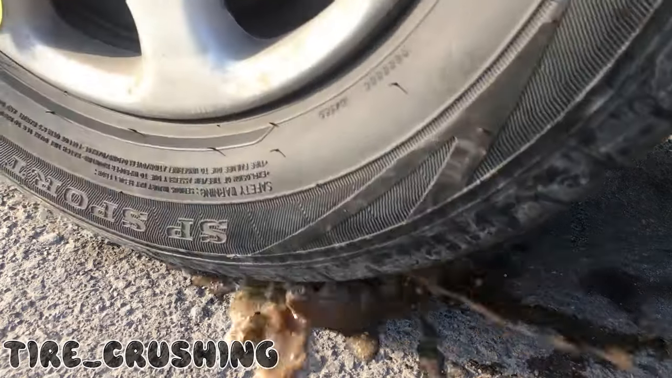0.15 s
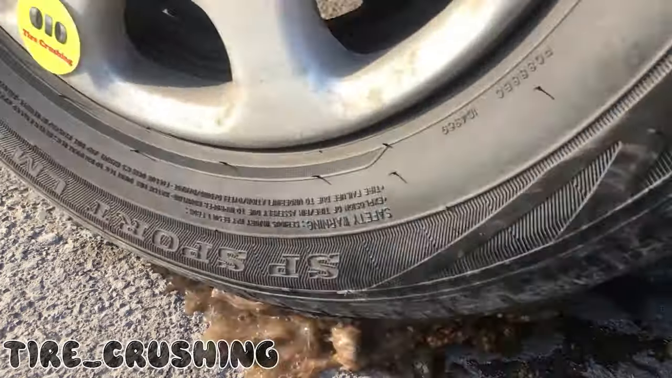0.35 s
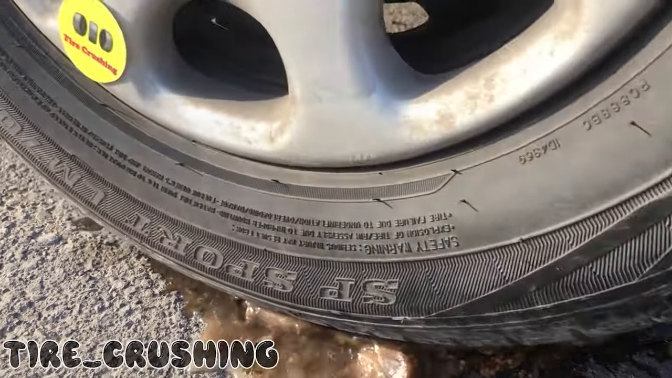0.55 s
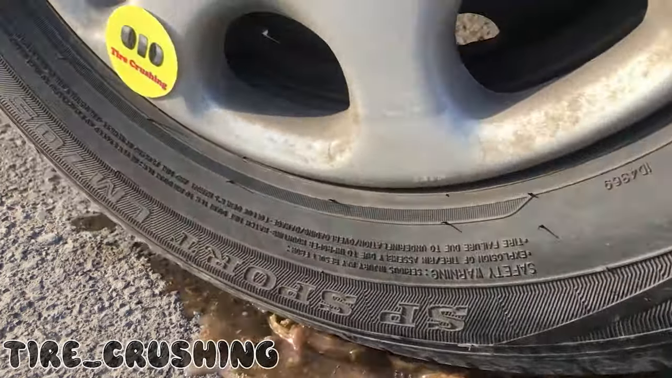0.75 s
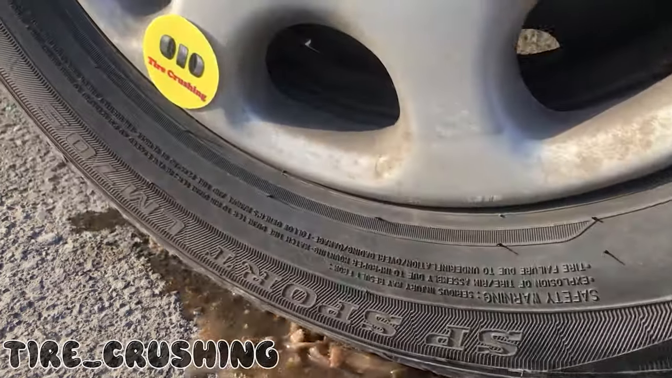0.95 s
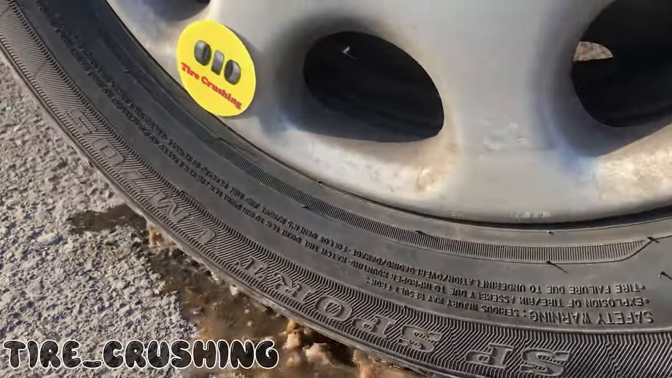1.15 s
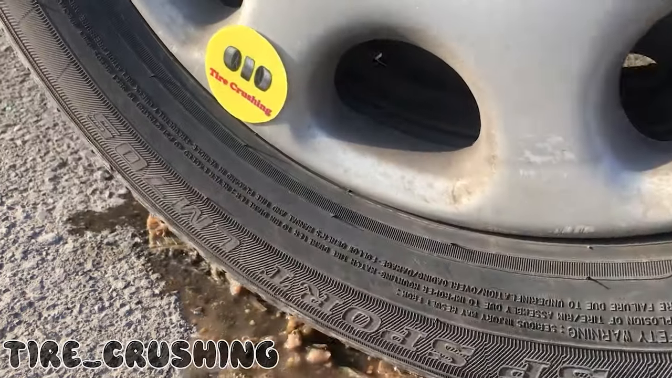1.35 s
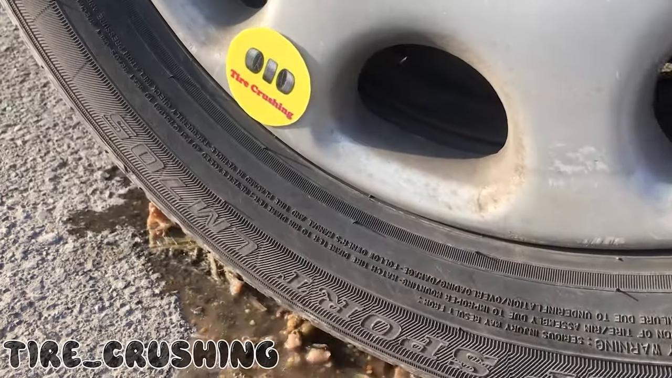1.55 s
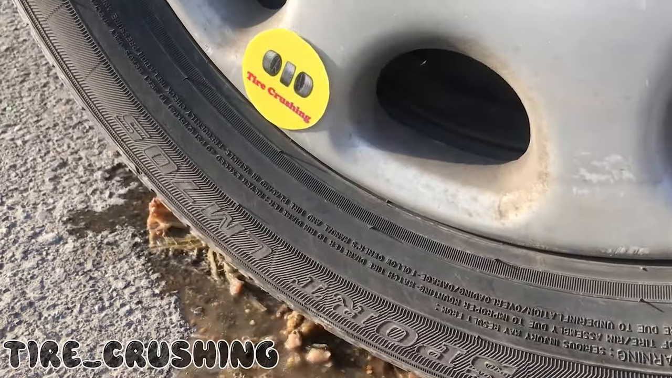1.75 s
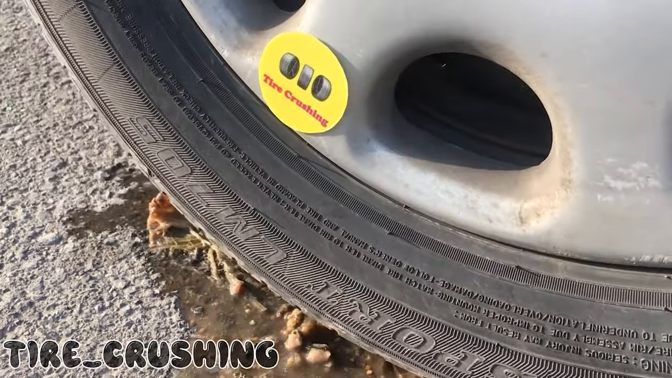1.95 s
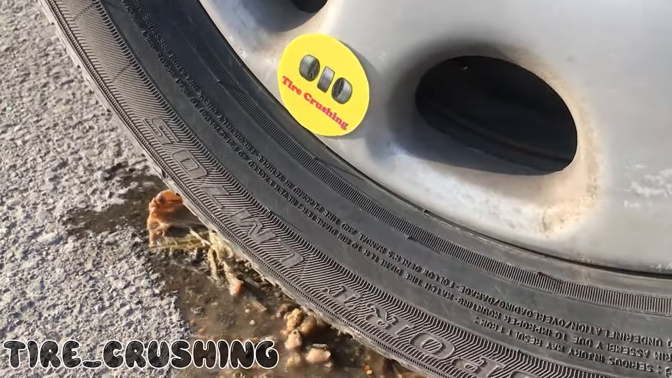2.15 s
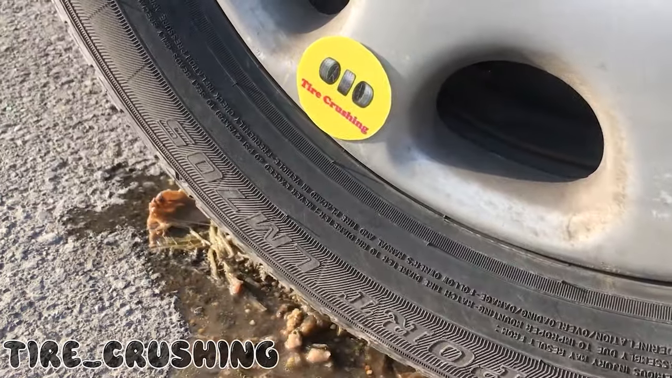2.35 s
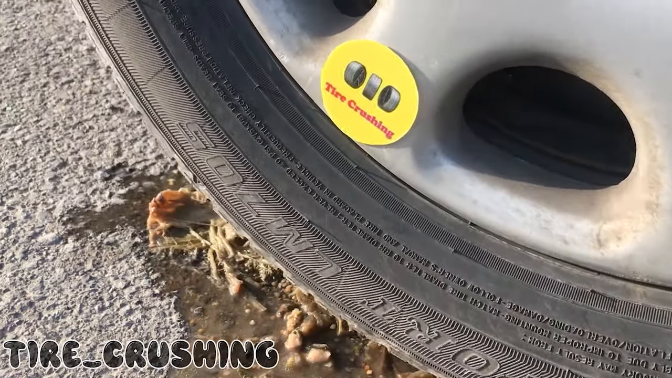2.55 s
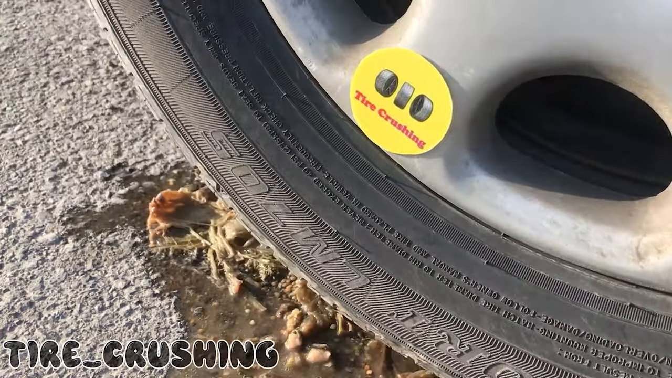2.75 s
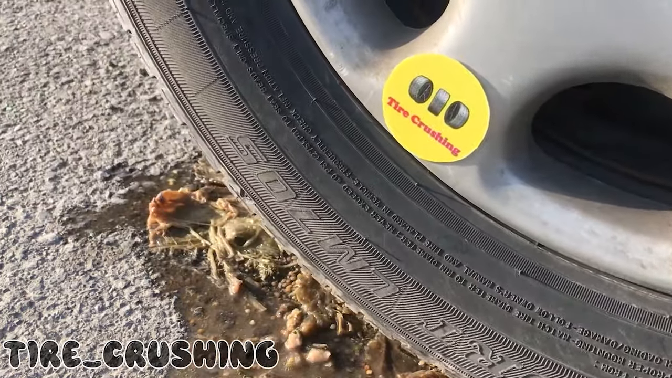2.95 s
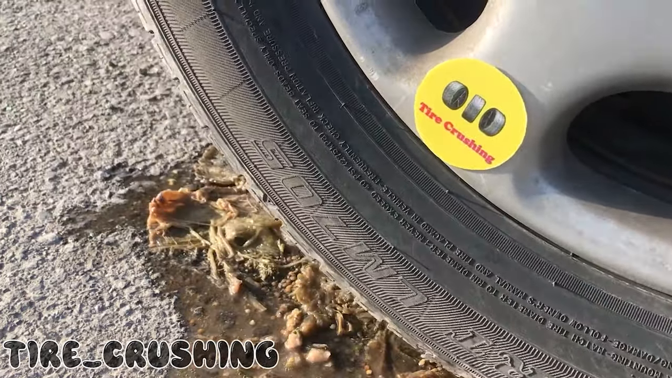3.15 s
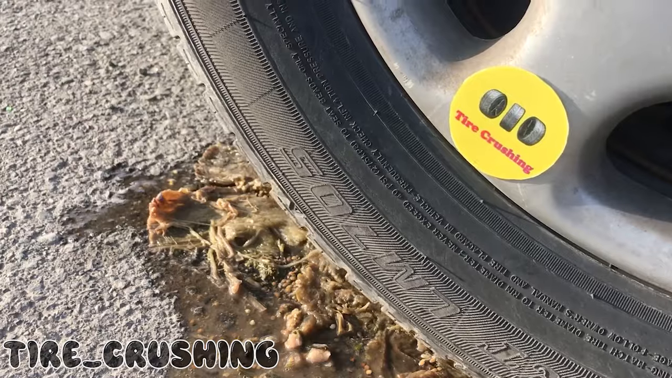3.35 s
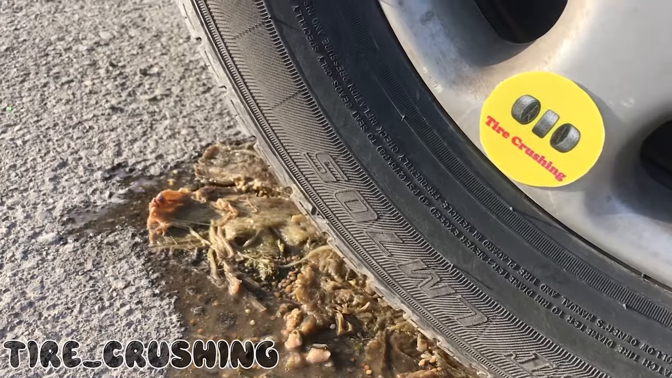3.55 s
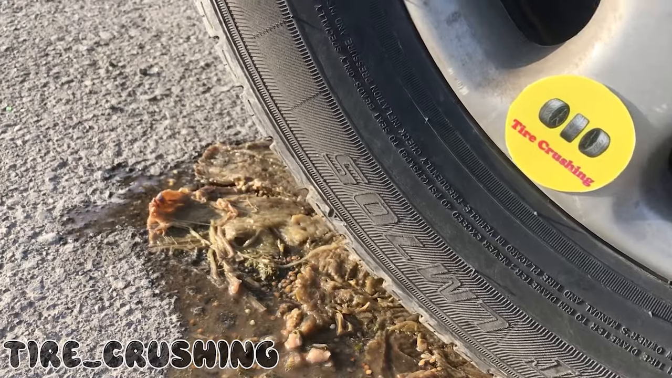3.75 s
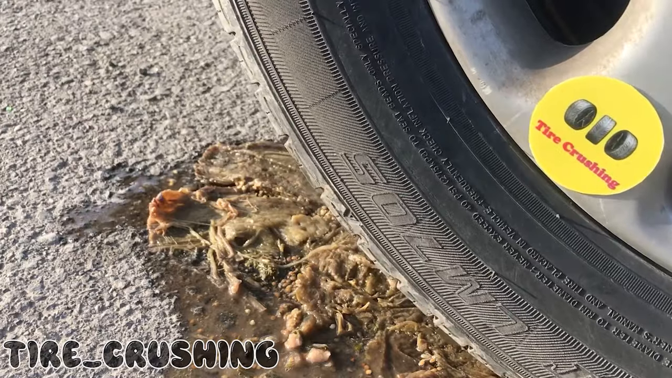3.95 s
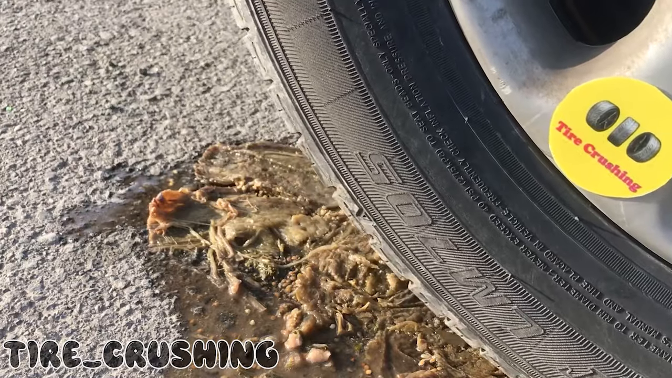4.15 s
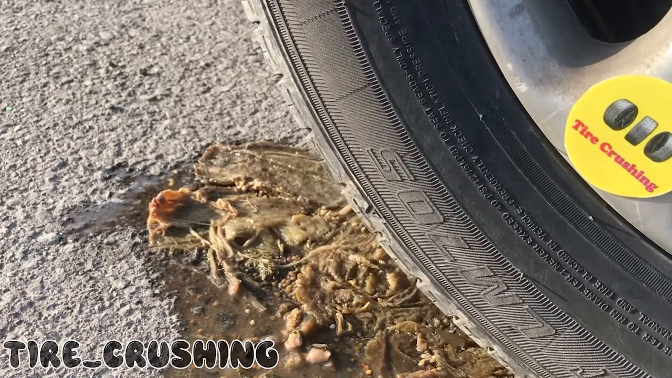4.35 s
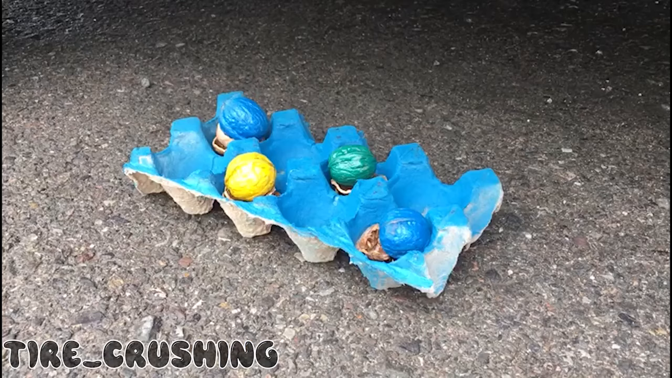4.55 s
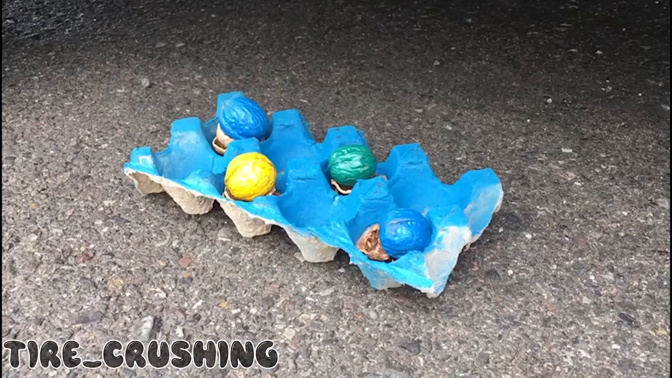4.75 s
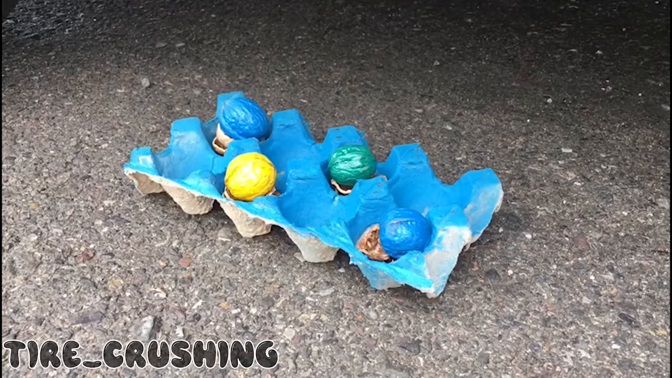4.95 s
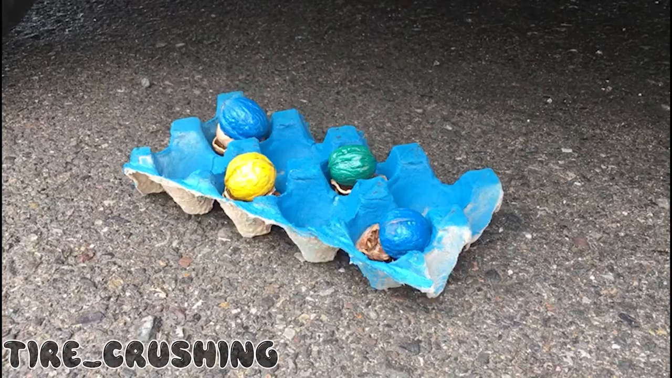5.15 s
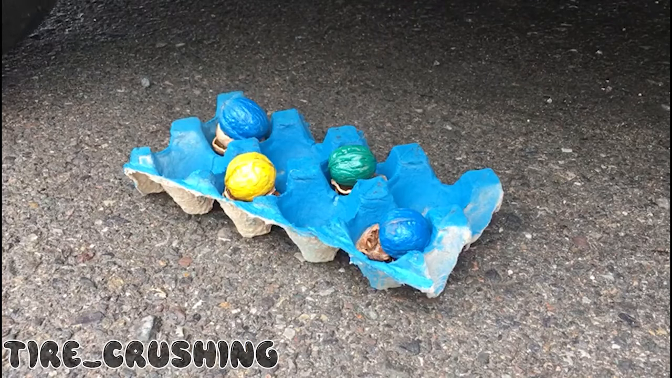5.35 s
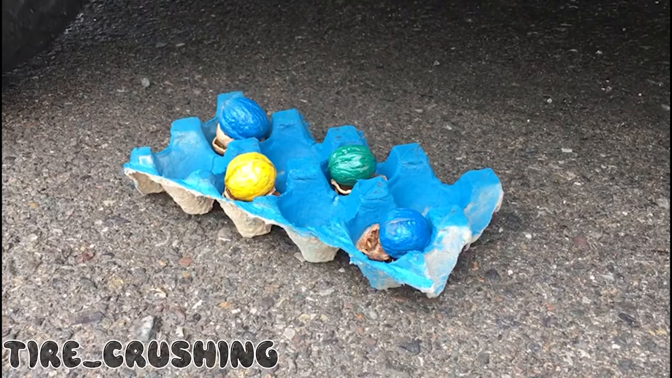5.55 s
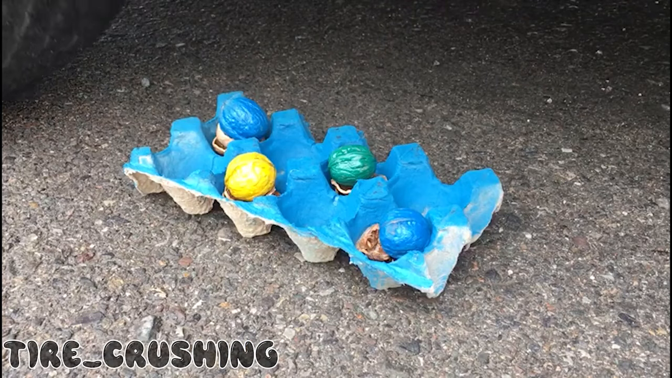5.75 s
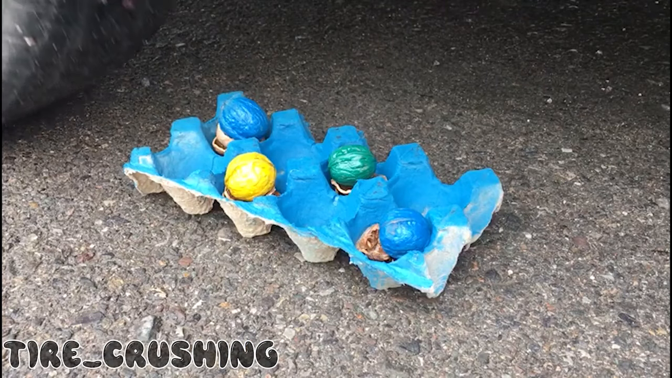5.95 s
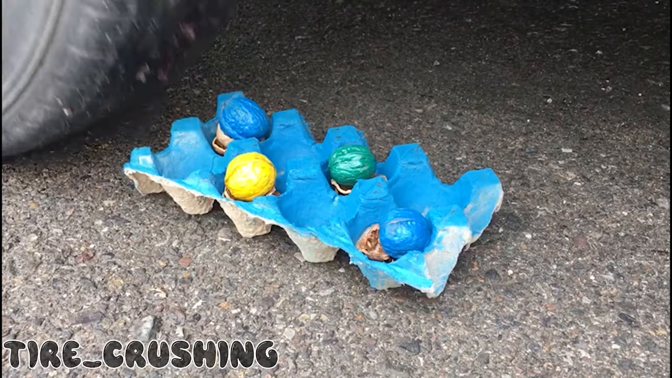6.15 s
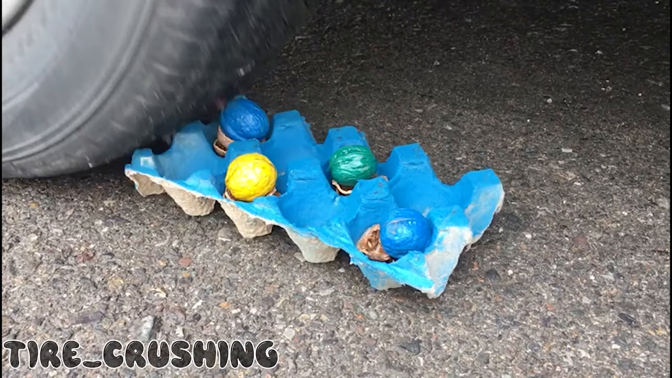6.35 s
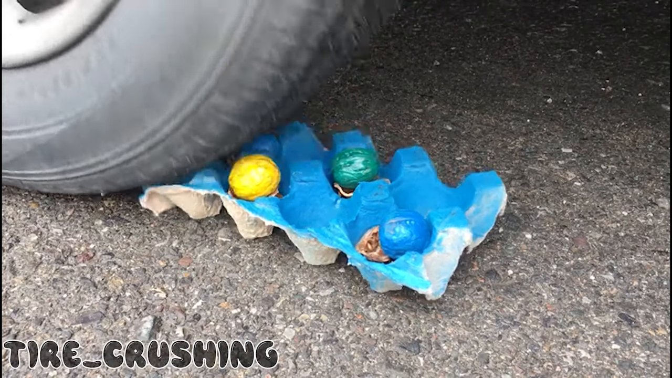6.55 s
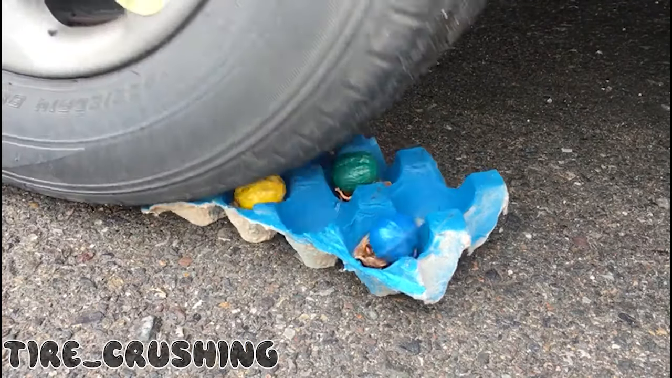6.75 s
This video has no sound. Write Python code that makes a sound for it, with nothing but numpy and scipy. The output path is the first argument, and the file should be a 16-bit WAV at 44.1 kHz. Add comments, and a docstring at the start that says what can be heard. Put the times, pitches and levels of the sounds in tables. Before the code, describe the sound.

A car idles and rolls slowly off wet squelching pulp with occasional knocks, then another approach over grit crushes walnuts in rapid, loud dry cracks.

```python
"""On asphalt, close to a tyre: a car with its engine idling rolls slowly off wet pulp, knocking now and then.
The scene then changes: the car creeps up over grit and crushes a cardboard tray of walnuts in quick dry cracks.
Shells are falling sine pops with filtered snaps and thuds; pulp, cardboard and grit are random ringing grains.
Knocks are filtered noise with decaying body modes; the cars are coloured noise and wavering sine lines.
Dense random echoes under the car answer the close sounds."""
import sys
import numpy as np
from scipy import signal
from scipy.fft import rfft, irfft
from scipy.io import wavfile
from scipy.ndimage import map_coordinates

SR = 44100
rng = np.random.default_rng(int(sys.argv[2]) if len(sys.argv) > 2 else 0)


def inscribe(sig):
    """Save sig as 16-bit PCM at rate SR to the path in sys.argv[1].

    A 1-D sig is mono; a 2-D sig holds one channel per row.
    Samples are clipped to [-1, 1] before scaling.
    """
    pcm = np.round(np.clip(np.atleast_2d(sig).T, -1, 1) * 32767)
    wavfile.write(sys.argv[1], SR, pcm.astype(np.int16))


N = 303849
T = np.arange(N) / SR
CUT_S = 4.573  # change from departing to approaching car

# shell fractures: (time [s], pop of the hollow shell [dB], its nominal pitch [Hz],
# snap of the splitting edge [dB], its pitch [Hz], thud of the dropping tyre [dB])
SHELL_FRACTURES = [(6.5118, -9.5, 1370, -4.5, 4340, -26), (6.5407, -19, 1620, -15, 3500, -29),
                   (6.545, -1.5, 1910, -6.5, 2690, -44), (6.5611, -12, 1620, -15, 3200, -32),
                   (6.577, -34, 1190, -19, 5500, -31), (6.586, -13.5, 1060, -15.5, 3540, -38),
                   (6.596, -8.5, 990, -8, 4550, -31), (6.6074, -12, 1310, -11, 4500, -25),
                   (6.615, -7, 1230, -7, 4100, -35), (6.624, 0, 1320, -8, 3300, -13.5),
                   (6.6351, -5, 1290, -9, 6400, -18), (6.6431, -13, 990, -22, 3000, -37),
                   (6.6524, -3.5, 1210, -10, 4000, -20), (6.658, 0, 1004, -8, 5740, -13.5),
                   (6.662, -10, 1260, -9.5, 5130, -14), (6.6697, -2.5, 1150, -11, 3030, -26),
                   (6.688, -2, 953, -11, 3180, -23), (6.717, -29, 1180, -23, 3500, -43),
                   (6.7356, -7, 1070, -15.5, 4600, -23), (6.743, -25, 1170, -18.5, 4180, -27),
                   (6.7801, -18, 1170, -22, 2500, -36), (6.785, -6.5, 920, -13, 5000, -14.5),
                   (6.7869, 1, 1014, -7.5, 3370, -2.5), (6.795, -7, 834, -21, 4000, -17),
                   (6.8027, -14, 1250, -16, 5500, -16), (6.825, -28, 2070, -11.5, 7260, -26),
                   (6.833, -17, 1400, -12.5, 8000, -26), (6.8427, -11, 1230, -8, 3080, -32),
                   (6.8439, -0.5, 910, -6, 6600, -28), (6.853, -25, 1240, -19, 4500, -39),
                   (6.8578, -20, 1360, -9, 6000, -44), (6.8615, -10, 820, -9, 7560, -13.5),
                   (6.8715, -6.5, 850, -15, 4500, -23)]


def amp(db):
    """Amplitude factor of a level in dB."""
    return 10 ** (np.asarray(db) / 20)


def evened(x):
    """Scale to unit rms."""
    return x / np.sqrt(np.mean(x ** 2) + 1e-20)


def read(points, hz):
    """Interpolate (frequency [Hz], value) over log frequency."""
    f, value = np.transpose(points)
    return np.interp(np.log(hz + 1), np.log(f + 1), value)


def level(curve):
    """Gain along (time [s], level [dB]), silent beyond 50 ms outside it."""
    s, db = np.transpose(curve)
    return amp(np.interp(T, s, db)) * (T > s[0] - .05) * (T < s[-1] + .05)


def add(mix, s, sound):
    """Add a sound to the mix in place, starting at s seconds."""
    part = mix[max(round(s * SR), 0):][:len(sound)]
    part += sound[:len(part)]


def colour(x, points, size=4096):
    """Minimum-phase filter of the given spectrum and unit energy: clicks keep their sharp front."""
    log_gain = np.log(amp(read(points, abs(np.fft.fftfreq(size, 1 / SR)))))
    spectrum = np.exp(signal.hilbert(log_gain).conj())
    taps = np.fft.ifft(spectrum).real[:size // 2]
    return signal.oaconvolve(x, taps / np.linalg.norm(taps))[:len(x)]


def drift(rate_hz):
    """Slow random curve of unit rms: noise under a Gaussian low-pass."""
    hz = np.fft.rfftfreq(N, 1 / SR)
    spectrum = rfft(rng.standard_normal(N)) * np.exp(-(hz / rate_hz) ** 2)
    return evened(irfft(spectrum, N))


def burst(s, length, rise, fall):
    """Linear attack, hold and exponential release; all in seconds."""
    attack = np.clip((T - s) / rise, 0, 1)
    return attack * np.exp(-np.maximum(T - s - length, 0) / fall)


def grains(per_s, spread_db, low_hz, high_hz, cycles, count=24):
    """Tiny clicks of uneven size, each ringing a resonator of random pitch that falls to 1/e in `cycles`."""
    size_db = spread_db * np.minimum(rng.exponential(1, N), 4)
    struck = rng.random(N) < per_s / SR
    size = amp(size_db) * rng.choice([-1, 1], N) * struck
    kind, out = rng.integers(0, count, N), np.zeros(N)
    for k, hz in enumerate(np.linspace(low_hz, high_hz, count)):
        r = np.exp(-hz / cycles / SR)
        turn = r * np.cos(2 * np.pi * hz / SR)
        clicks = size * (kind == k) + 1e-18  # offset avoids denormals
        out += signal.lfilter([1, -turn], [1, -2 * turn, r * r], clicks) * np.sqrt(1 - r)
    return evened(out)


def edge_colour(edge_hz, count=22):
    """Spectrum of one snap: the colour of shell, lifted where this edge rings, with uneven side peaks."""
    # shell colour: (frequency [Hz], level [dB])
    shell_colour = [(800, -4.5), (2000, 5), (3200, 0.5), (4200, 4), (7000, 1.5), (10000, -6),
                    (12500, -11.5)]
    lift_db, width_octaves, uneven_db = 7, 0.24, 2.5
    hz = np.geomspace(shell_colour[0][0], shell_colour[-1][0], count)
    lift = lift_db * np.exp(-(np.log2(hz / edge_hz) / width_octaves) ** 2)
    return np.c_[hz, read(shell_colour, hz) + lift + uneven_db * rng.standard_normal(count)]


def walnuts():
    """Each edge snaps, the pop falls in pitch as the shell opens, and the tyre thuds, lower for a deeper pop."""
    start, settle, glide_s = 2.28, 0.7, 0.00036  # pop pitch: nominal x (settle + start * decay)
    pop_cycles, snap_s = 2.04, 0.00087  # pop length in nominal cycles
    thud_share, thud_s = 0.23, 0.002  # thud pitch: nominal x share
    out, t = np.zeros(N), np.arange(SR // 25) / SR
    for s, pop_db, hz, snap_db, edge_hz, thud_db in SHELL_FRACTURES:
        turns = np.cumsum(hz * (settle + start * np.exp(-t / glide_s))) / SR
        pop_shape = (1 - np.exp(-t / 0.00035)) * np.exp(-(t * hz / pop_cycles) ** 2)
        pop = np.sin(2 * np.pi * turns) * pop_shape
        snap_shape = np.exp(-t / snap_s) + 0.041 * np.exp(-t / 0.0015)
        snap = colour(rng.choice([-1, 1], len(t)) * snap_shape, edge_colour(edge_hz))
        thud_shape = np.exp(-t / thud_s) * (1 - np.exp(-t / 0.00028))
        thud = np.sin(2 * np.pi * hz * thud_share * t) * thud_shape
        add(out, s, amp(pop_db) * pop + amp(snap_db) * snap + amp(thud_db) * thud)
    return out


def tray():
    """Cardboard fibres break in dense clumps as the tray folds, and shards crunch after each fracture."""
    # cardboard and shell crumbs giving way: (time [s], level [dB])
    crumple_curve = [(6.39, -62), (6.45, -48), (6.53, -40), (6.595, -29.5), (6.63, -21.5), (6.72, -47),
                     (6.775, -42), (6.795, -26.5), (6.89, -49)]
    # (frequency [Hz], level [dB])
    crumple_colour = [(150, -7.5), (400, -2.5), (700, 4.5), (1600, 0), (3200, -7.5), (6000, -11),
                      (10000, -14), (13000, -25)]
    shards_db, shards_s = -17.5, 0.0075  # level against the snap, decay
    crackle = grains(5000, 3.2, 600, 12000, 1.2) * amp(1.8 * drift(90))
    shards_power = sum(amp(snap_db + shards_db) ** 2 * burst(s, 0, 0.00086, shards_s) ** 2
                       for s, _, _, snap_db, _, _ in SHELL_FRACTURES)
    gain = np.sqrt(level(crumple_curve) ** 2 + shards_power)
    return gain * evened(colour(crackle, crumple_colour))


def squish():
    """Small bubbles burst in clumps as the pulp squirts and oozes out; larger ones gurgle lower."""
    # squirts from under the tread: (time [s], length [s], fizz [dB], gurgle [dB])
    squirts = [(0, 0.0044, -46.5, -49), (.058, 0.013, -60, -64), (0.101, 0.017, -49, -54),
               (0.222, 0.0076, -50, -61), (0.25, 0.082, -50.5, -51.5), (0.383, 0.032, -65, -60),
               (0.557, 0.063, -65.5, -56), (0.668, 0.16, -64.5, -65), (.89, .06, -77, -63),
               (3.676, 0.063, -75, -68)]
    # colours of squirt, ooze and gurgle: (frequency [Hz], level [dB])
    squirt_colour = [(200, -13), (700, 12), (2000, -0.5), (3200, 4.5), (6000, -1.5), (9500, -3),
                     (12000, -16), (16000, -17)]
    ooze_colour = [(700, -3), (2000, 5.5), (3200, 4.5), (6000, 14), (8000, -9.5), (12000, -10),
                   (16000, -22)]
    gurgle_colour = [(300, -3), (700, 4.5), (1100, 3), (1700, 7), (2400, 0.5), (5000, -33)]
    rise_s, fall_s, droplets_db = 0.0013, 0.023, -8  # droplets against the fizz
    ooze_db, ooze_gurgle_db, ooze_fade_db_per_s = -60, -76, 17.5  # levels at time 0
    fizz = grains(2400, 3.3, 1200, 15000, 3.5) * amp(2.2 * drift(70))
    droplets = grains(500, 3.6, 2200, 13000, 8, count=40)
    bubbles = grains(400, 3.6, 750, 2400, 4)
    wet = fizz + amp(droplets_db) * droplets
    ooze = amp(-ooze_fade_db_per_s * T)
    squirt, gurgle = np.zeros(N), amp(ooze_gurgle_db) * ooze
    for s, length, fizz_db, gurgle_db in squirts:
        flow = burst(s, length, rise_s, fall_s)
        squirt = np.hypot(squirt, amp(fizz_db) * flow)
        gurgle = np.hypot(gurgle, amp(gurgle_db) * flow)
    squirting = squirt * evened(colour(wet, squirt_colour))
    oozing = amp(ooze_db) * ooze * evened(colour(wet, ooze_colour))
    return squirting + oozing + gurgle * evened(colour(bubbles, gurgle_colour))


def ticks():
    """Wet pops and grit snapping under the tread: each a brief ring with a splash of hiss."""
    # (time [s], level [dB], pitch [Hz])
    tick_events = [(.006, -29.5, 1730), (0.062, -40, 2900), (.095, -29, 8800), (.122, -39, 2600),
                   (0.15, -41, 2170), (0.218, -42, 2400), (.299, -36, 5040), (.33, -39, 2600),
                   (.339, -45, 2200), (.388, -33, 1920), (.394, -42, 2200), (0.446, -40, 520),
                   (0.605, -42.5, 6700), (.663, -38.5, 1770), (.734, -40.5, 3800), (1.106, -40.5, 2060),
                   (1.475, -45, 5400), (1.66, -45, 4300), (2.163, -51, 3800), (2.578, -47, 2930),
                   (2.603, -48.5, 2900), (3.62, -51, 2980), (3.684, -40, 3660), (3.688, -42, 4100),
                   (3.706, -49, 3300), (3.738, -41.5, 2480), (4.094, -49, 9000), (4.305, -46, 2740),
                   (4.895, -49, 5000), (5.805, -41, 2670), (5.829, -39, 2400), (6.101, -34, 2250),
                   (6.144, -37, 3050), (6.175, -33, 2360), (6.269, -37, 2600), (6.297, -30.5, 2120)]
    # splash colour: (frequency [Hz], level [dB])
    splash_colour = [(400, 2), (2000, 3), (5000, -9), (10000, -9), (15000, -22)]
    ring_cycles = 2.55  # decay to 1/e
    out, t = np.zeros(N), np.arange(SR // 30) / SR
    for s, db, hz in tick_events:
        ring_shape = np.exp(-t * hz / ring_cycles) * (1 - np.exp(-t * hz * 1.5))
        ring = np.sin(2 * np.pi * hz * t) * ring_shape
        spray = rng.standard_normal(len(t)) * np.exp(-t / .0025)
        near_pitch = colour(spray, [(hz / 4, -12), (hz, 0), (hz * 2, -6), (hz * 5, -18)])
        add(out, s, amp(db) * (ring + 0.25 * colour(near_pitch, splash_colour)))
    return out


def grit():
    """Sand grains crunch in clumps under the tread, louder as its distance shrinks."""
    # (frequency [Hz], level [dB])
    grit_colour = [(1500, -6), (2600, 6.5), (4400, 1.5), (7000, -5), (9500, -8), (12000, -8)]
    arrival_db, arrival_s, half_s = -63.5, 5.96, 0.16  # half amplitude half_s before arrival
    sand = grains(900, 3.6, 1800, 11500, 2) * amp(1.6 * drift(18))
    nearness = 1 / (1 + np.maximum(arrival_s - T, 0) / half_s)
    return amp(arrival_db) * nearness * (T > CUT_S) * evened(colour(sand, grit_colour))


def scuff():
    """The tread slips once and drags many sand grains at a time."""
    # (time [s], length [s], level [dB])
    slip_event = (4.678, .014, -64.5)
    # (frequency [Hz], level [dB])
    scuff_colour = [(2000, -6), (3500, 3), (5500, 4), (7500, 0), (10000, -6), (12000, -3)]
    sand = grains(5000, 2.4, 3000, 11500, 2)
    s, length, db = slip_event
    slip = burst(s, length, .008, .05)
    return amp(db) * slip * evened(colour(sand, scuff_colour))


def crumbs():
    """Crumbs of pulp let go of the tread: sparse sticky clicks, each ringing for a few cycles."""
    # (frequency [Hz], level [dB])
    crumb_colour = [(1000, -43), (2200, 6.5), (3300, 3.5), (5500, -6.5), (7500, 6.5), (12000, 2),
                    (15000, -37)]
    start_db, fade_db_per_s = -72, 1.5
    clicks = grains(260, 3.6, 2200, 5600, 3)
    return amp(start_db - fade_db_per_s * T) * evened(colour(clicks, crumb_colour))


def knocks():
    """A hard contact and a short rattle, bright or dull, set the low modes of the car body ringing."""
    # (time [s], rattle [dB], rattle decay [s], rise [s], body ring [dB],
    # brightness [factor on the rattle colour's frequencies], contact click [dB])
    knock_events = [(1.860, -35, 0.011, 0.0037, -44, 1.3, -80),
                    (4.388, -33, 0.011, 0.0019, -33, 0.89, -48.5),
                    (5.268, -66, 0.0074, 0.002, -39.5, 0.61, -80)]
    # colours of rattle and bare contact: (frequency [Hz], level [dB])
    rattle_colour = [(100, 7), (320, 10.5), (450, 2), (650, 12), (850, 1), (1200, 6.5), (1550, 8),
                     (1950, -2.5), (2400, 3), (2900, -8), (3400, -16), (5000, -30), (15000, -53)]
    contact_colour = [(1500, -18), (3300, 10.5), (6000, 0), (9000, -3), (11000, -18), (15000, -22)]
    # body modes: (frequency [Hz], level [dB], t60 [s])
    body_modes = [(130, -8, 0.26), (165, -9, 0.4), (193, -4, 0.29), (233, -8.5, 0.25), (260.6, -4, 0.19),
                  (301, -4.5, 0.12), (331, -5.5, 0.16), (377, -17, 0.099), (695, 3, 0.023),
                  (1520, -19.5, 0.35)]
    contact_s = 0.0076
    out, t = np.zeros(N), np.arange(SR // 3) / SR
    for s, rattle_db, decay, rise, body_db, bright, contact_db in knock_events:
        contacts = rng.standard_normal(len(t))
        shifted = [(hz * bright, db) for hz, db in rattle_colour]
        rattle = colour(contacts * np.exp(-t / decay), shifted)
        click = colour(contacts * np.exp(-t / contact_s), contact_colour)
        ring = sum(amp(db - 60 * t / t60) * np.sin(2 * np.pi * hz * t) for hz, db, t60 in body_modes)
        knock = amp(rattle_db) * rattle + amp(contact_db) * click + amp(body_db) * ring
        add(out, s, knock * (1 - np.exp(-t / rise)))
    return out


def under_car(x, size=128):
    """Dense, short reflections between asphalt, tyre and floor pan, decaying at a rate set by frequency."""
    # (frequency [Hz], level [dB])
    gap_colour = [(60, -30), (240, -3), (330, 0), (420, 4.5), (520, 2.5), (650, -8.5), (1500, 0),
                  (3500, -0.5), (12000, -2.5)]
    # (frequency [Hz], t60 [s])
    gap_decay = [(100, 0.15), (700, 0.11), (2000, 0.078), (6000, 0.14), (12000, 0.13)]
    n = SR // 4
    echoes = (rng.random(n) < 5000 / SR) * (np.arange(n) / SR > .002)
    hz, t, z = signal.stft(rng.standard_normal(n) * echoes, SR, nperseg=size)
    fade = amp(-60 * t / read(gap_decay, hz)[:, None])
    tail = signal.istft(z * fade, SR, nperseg=size)[1]
    tail *= 1 + 2.0 * np.exp(-np.arange(len(tail)) / SR / 0.0023)  # nearest surfaces answer loudest
    return signal.oaconvolve(x, colour(tail / np.linalg.norm(tail), gap_colour))[:N]


def engine(lines, wander, flutter_db):
    """Idling engine lines that waver together in pitch and each in strength."""
    turns = np.cumsum(1 + wander * drift(4.48)) / SR
    out = np.zeros(N)
    for hz, db in lines:
        strength = amp(db + flutter_db * drift(28.0)) * np.sqrt(2)
        out += strength * np.sin(2 * np.pi * (hz * turns + rng.random()))
    return out


def rush(curve, points, flutter_db):
    """Turbulent air or exhaust: coloured noise with a restless level."""
    noise = evened(colour(rng.standard_normal(N), points))
    return level(curve) * noise * amp(flutter_db * drift(41))


def sinking(x, speed):
    """Play a steady sound at a changing speed, so that its whole colour slides."""
    return map_coordinates(x, [np.cumsum(speed)], order=3, mode="wrap")


def away_rush():
    """Fan and air noise of the departing car, slowly growing fainter and duller."""
    # (frequency [Hz], level [dB])
    air_colour = [(150, 6.5), (350, 3), (480, 1.5), (900, 0), (1300, 1.5), (1750, -2.5), (2000, -10),
                  (2350, -13), (3500, -23), (5000, -24), (9000, -30.5), (12500, -33), (14000, -40)]
    start_db, end_db, settle_s = -49, -57, 0.94
    start_speed, end_speed, sink_s = 1.16, .83, 3.9  # factors on the colour's frequencies
    speed = end_speed + (start_speed - end_speed) * np.exp(-T / sink_s)
    db = end_db + (start_db - end_db) * np.exp(-T / settle_s)
    air = sinking(colour(rng.standard_normal(N), air_colour), speed)
    return amp(db) * evened(air) * amp(.7 * drift(25))


def departing_car():
    """Low noise rumble, sinking fan rush and wavering engine lines of the car driving away."""
    # (time [s], level [dB])
    rumble_curve = [(0, -47.5), (.5, -52.5), (1, -50), (1.6, -51), (2.1, -47), (2.6, -56.5), (3.3, -49.5),
                    (3.7, -53.5), (4.57, -53.5)]
    # (frequency [Hz], level [dB])
    rumble_colour = [(20, -31.5), (32, -17), (44, 6), (75, 0), (105, -6), (190, -21), (320, -18.5),
                     (500, -34), (900, -69)]
    # engine: (frequency [Hz], level [dB])
    engine_lines = [(47, -70.5), (71, -61.5), (141, -66)]
    return rush(rumble_curve, rumble_colour, 0.46) + away_rush() + engine(engine_lines, 0.0216, 2.8)


def approaching_car():
    """Low noise rumble, air rush and wavering engine lines of the car drawing near."""
    # rumble and air: (time [s], level [dB])
    rumble_curve = [(4.57, -45), (5.5, -48), (6.3, -44), (6.89, -63)]
    air_curve = [(4.57, -45.5), (5.2, -49), (6.3, -51.5), (6.89, -50)]
    # rumble and air: (frequency [Hz], level [dB])
    rumble_colour = [(20, -37), (35, 4), (56, 5.5), (95, 1), (170, -6), (250, -12.5), (400, -18),
                     (900, -54)]
    air_colour = [(200, 1), (480, 6), (620, 3.5), (950, 6.5), (1600, 6.5), (2400, -0.5), (3300, -13),
                  (5000, -24), (9500, -29), (12000, -97)]
    # engine: (frequency [Hz], level [dB])
    engine_lines = [(75.6, -47.5), (123, -61), (151, -53), (462, -68), (964, -66), (1373, -66.5),
                    (1610, -68)]
    rumble = rush(rumble_curve, rumble_colour, 0.6)
    air = rush(air_curve, air_colour, 0.79)
    return rumble + air + engine(engine_lines, 0.00768, 1.83)


def scene():
    """The departing car, then the approaching one; the sound drops out for an instant between them."""
    close = walnuts() + tray() + squish() + ticks() + grit() + scuff() + crumbs()
    events = knocks() + close + amp(-11.5) * under_car(close)
    before_cut = np.clip((CUT_S - .011 - T) / .003, 0, 1)
    after_cut = np.clip((T - CUT_S) / .002, 0, 1)
    departing = (departing_car() + events) * before_cut
    approaching = (approaching_car() + events) * after_cut
    return (departing + approaching)[None]


def record(dry):
    """The microphone sheds deep bass and rounds off the loudest cracks; the band is narrower from CUT_S on."""
    low_cut_hz, ceiling = 37, .92
    top_hz, second_top_hz = 15800, 12100
    lean = signal.sosfilt(signal.butter(3, low_cut_hz, "high", fs=SR, output="sos"), dry)
    held = lean / (1 + (lean / ceiling) ** 6) ** (1 / 6)

    def low_pass(hz):
        """Linear-phase limit of the band."""
        taps = signal.firwin(255, hz, window=("kaiser", 8), fs=SR)
        return signal.oaconvolve(held, taps[None], "same")

    return np.where(T < CUT_S, low_pass(top_hz), low_pass(second_top_hz))


dry = scene()
out = record(dry)
inscribe(out)
```